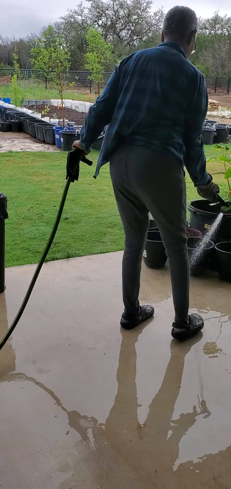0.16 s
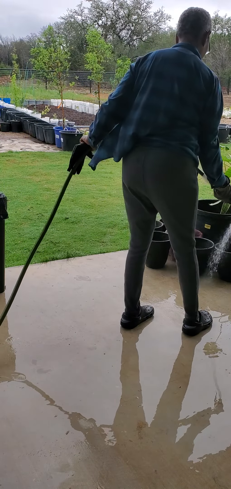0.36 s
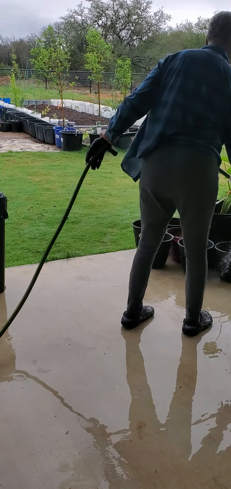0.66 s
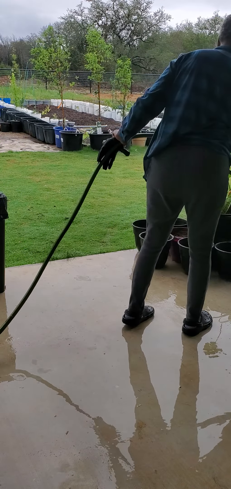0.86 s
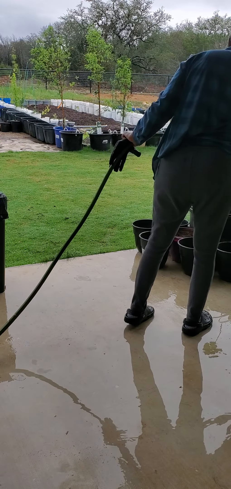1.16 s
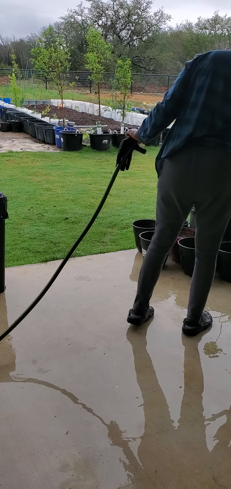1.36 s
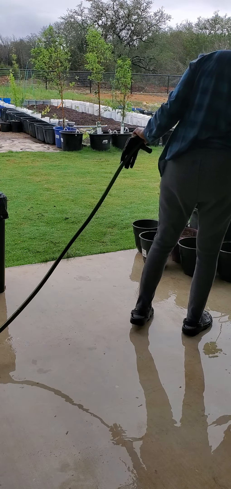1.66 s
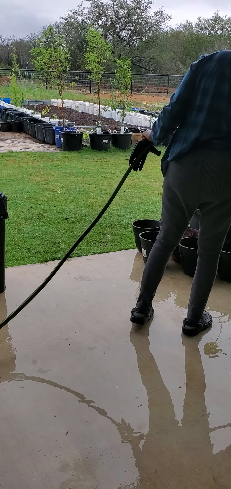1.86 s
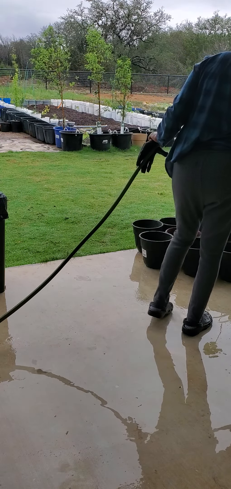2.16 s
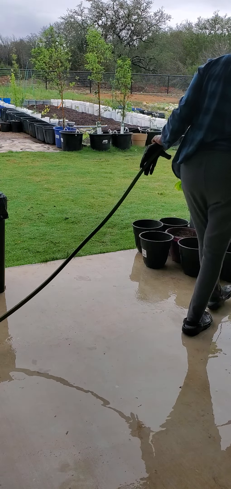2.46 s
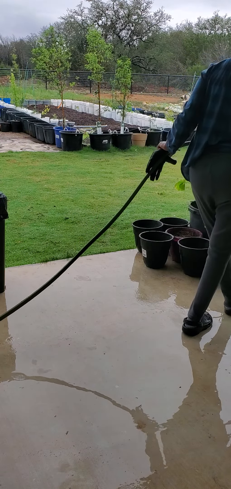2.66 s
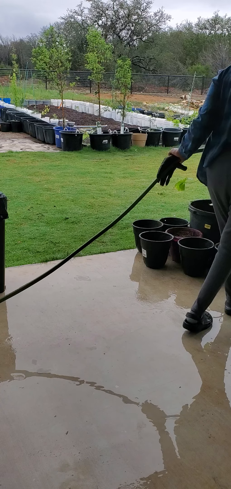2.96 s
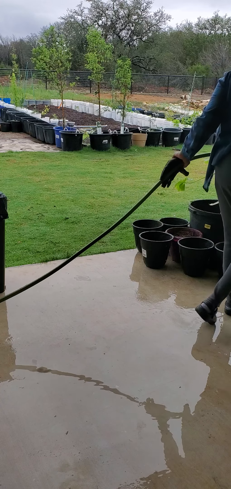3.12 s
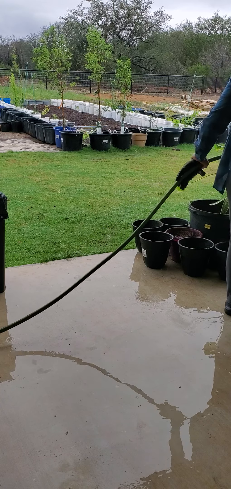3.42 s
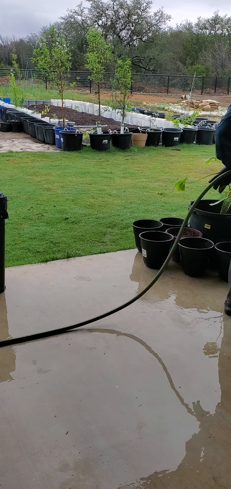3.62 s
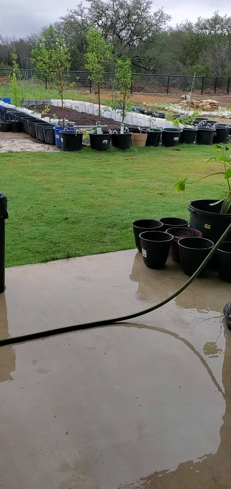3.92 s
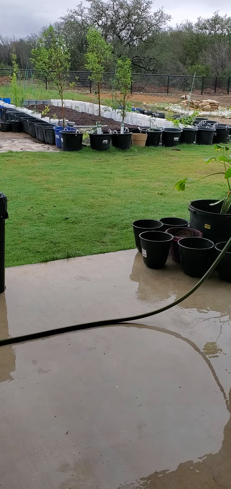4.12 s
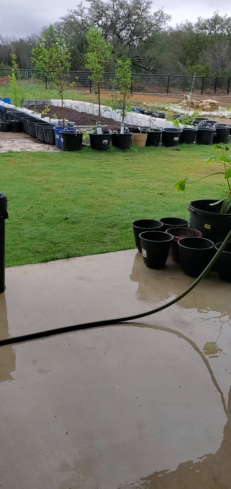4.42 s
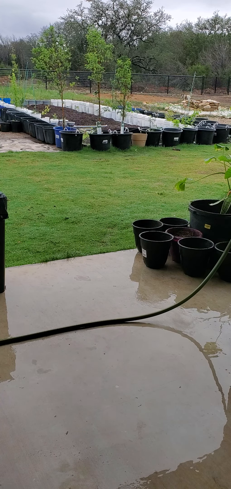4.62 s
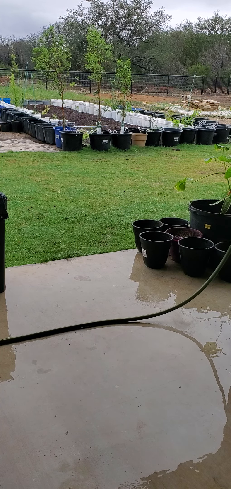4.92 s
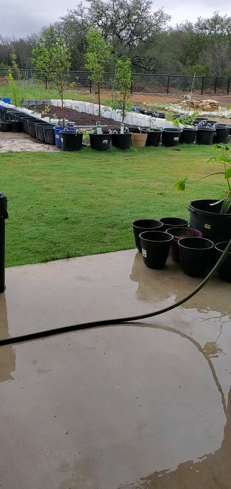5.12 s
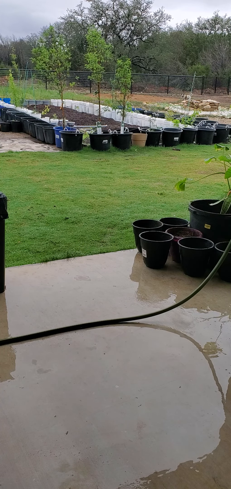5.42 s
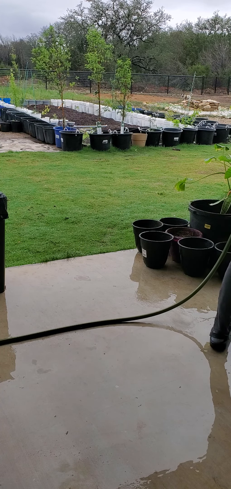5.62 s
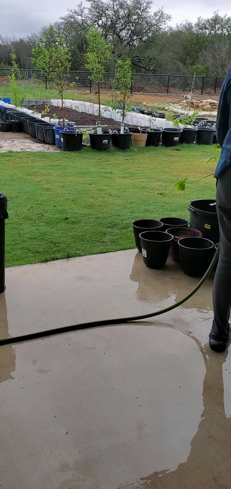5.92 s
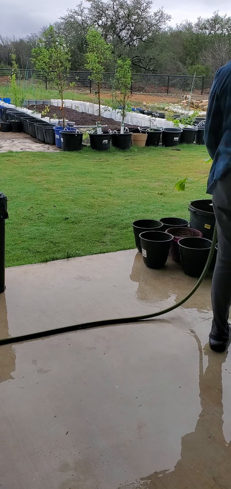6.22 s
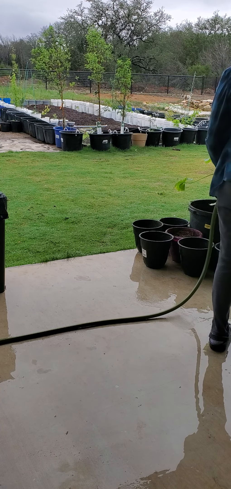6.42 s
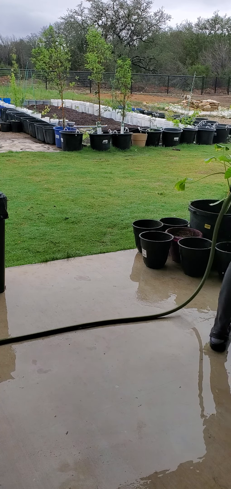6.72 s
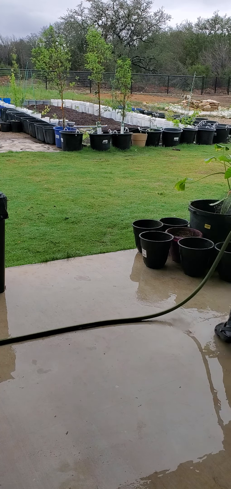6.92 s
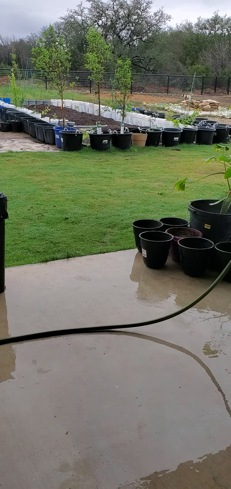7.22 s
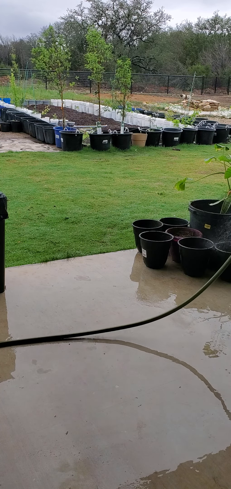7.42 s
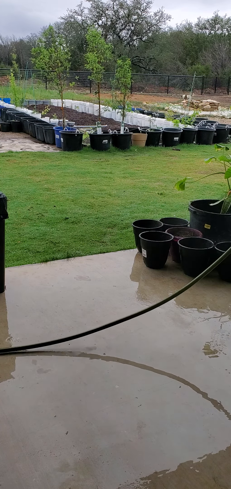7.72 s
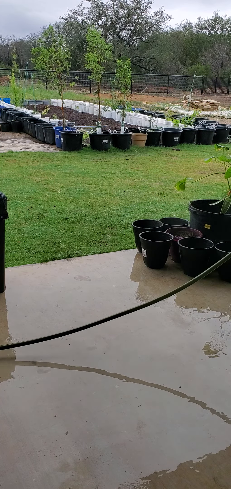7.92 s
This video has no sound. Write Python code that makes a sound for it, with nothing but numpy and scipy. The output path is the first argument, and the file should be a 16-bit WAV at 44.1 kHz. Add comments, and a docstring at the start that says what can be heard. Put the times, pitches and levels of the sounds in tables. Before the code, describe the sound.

Hose water hisses and patters on leaves and wet concrete, then thins to softer splashing over a low outdoor rumble.

```python
"""A bright fizz of spray on leaves opens the scene: a hose waters potted plants on a wet concrete patio.
Each drop's impact is a tiny noise burst; thousands merge into fizz, splash and hiss over outdoor rumble
and a far engine. Hollow rings and bands of high hiss come and go, and large drops tick close by. Later
the spray drums on the resonant walls of two plastic pots, gouts of water slap down and wind puffs once.
The fizz eases while the jet is aimed into soil."""
import sys
import numpy as np
from scipy import signal
from scipy.fft import rfft, irfft
from scipy.io import wavfile
from scipy.ndimage import uniform_filter1d

SR = 44100
rng = np.random.default_rng(int(sys.argv[2]) if len(sys.argv) > 2 else 0)


def unload_audio(sound):
    """Save the sound as a 16-bit wav file, at the path given as the first command line argument."""
    columns = np.transpose(np.atleast_2d(sound))
    # keep every value between -1 and 1, then stretch to whole-number steps
    steps = np.round(np.clip(columns, -1, 1) * 32767)
    wavfile.write(sys.argv[1], SR, steps.astype(np.int16))


N = 355887
TIME, FREQS = np.arange(N) / SR, np.fft.rfftfreq(N, 1 / SR)

# Levels are relative within each table; T60 is the time to decay by 60 dB.
# spray on the leaves, and steady splash on wet ground: t/s, level/dB
LEAF_FLOW = [(0, -34.5), (0.9, -35), (1.35, -34), (1.9, -36), (2.55, -33), (2.95, -34), (3.55, -38),
             (4.2, -38.5), (4.68, -38), (5.05, -56), (5.6, -59), (6.18, -51.5), (6.42, -66.5), (6.79, -40),
             (7.03, -56), (7.72, -48.5), (7.93, -49.5), (8.07, -56)]
GROUND_FLOW = [(0, -49), (2.8, -53), (4.3, -56), (5.05, -61.5), (6.0, -55.5), (6.5, -63), (6.95, -45.5),
               (7.22, -41.5), (7.9, -43.5), (8.07, -47)]
# the jet swings from leaves to soil: t/s, half length/s, splash level/dB, hiss level/dB, fizz dip/dB
JET_SWINGS = [(0.16, 0.07, -45.5, -46.5, 2), (0.297, 0.087, -42, -39, 3.5), (1.112, 0.13, -43.5, -48, 5.5),
              (1.688, 0.11, -41.5, -40, 5), (2.286, 0.18, -41.5, -48.5, 6), (2.666, 0.12, -42.5, -39.5, 4),
              (3.763, 0.18, -40.5, -61, 0), (6.766, 0.17, -42, -42, 5)]
# the jet clips a rim and spits mist: t/s, level/dB, T60/s
RIM_SPITS = [(0.097, -33.5, .25), (.874, -37, .22), (2.56, -36, 0.16), (2.803, -33, 0.083),
             (3.46, -39, 0.4), (4.01, -39, 0.22), (4.135, -40.5, .25), (4.72, -45, 0.49)]
# swells of the engine's drone: t/s, half length/s, level/dB
ENGINE_SWELLS = [(0, .35, -57), (1.25, 0.7, -48.5), (3.05, 0.19, -51)]
# brief hollow rings and narrow bands of high hiss as the jet moves: t/s, f/Hz, level/dB, half length/s
SPRAY_RESONANCES = [(0.282, 2020, -40.5, 0.048), (.97, 1400, -52, 0.12), (1.55, 6640, -57, .35),
                    (1.757, 2680, -45, 0.11), (1.776, 3930, -47, .14), (2.24, 2450, -44, 0.072),
                    (2.71, 1840, -49, 0.23), (3.365, 6600, -43.5, 0.27), (4.55, 6250, -54, 0.44),
                    (6.78, 2970, -41.5, 0.13), (7.197, 1490, -44.5, 0.05), (7.93, 1500, -44.5, 0.059)]
# large drops striking leaves: t/s, level/dB, T60/s
DROP_TICKS = [(.486, -22, .02), (.5315, -20, .012), (.627, -37, .015), (1.033, -26, .02), (1.688, -27, .04),
              (2.809, -24, .02), (3.047, -29, .015), (3.697, -25, .015), (4.4105, -16.5, .014),
              (4.417, -24, .015), (4.913, -36, .05), (5.365, -44, 0.23), (5.677, -38, .02),
              (5.697, -41, .053), (5.973, -35, 0.012), (6.048, -37, .06), (6.125, -39, .04),
              (7.611, -40, .02), (7.676, -36, 0.077), (7.792, -34, .04)]
# the jet crosses two plastic pots, one row a pot: t/s, level/dB, approach/s, leaving/s
POT_CROSSINGS = [(3.775, -35, 0.15, 0.14), (6.81, -37.5, 0.2, 0.17)]
# their modes, one list a pot: f/Hz, width/Hz, level/dB
POT_RESONANCES = [
    [(354, 55, -1), (465, 40, 3.5), (534, 64, -2), (613, 69, -2.5), (835, 79, -7), (1340, 130, -4),
     (1840, 140, -6.5)],
    [(235, 90, -8), (350, 60, -3), (450, 43, 2), (547, 150, -1.5), (840, 100, -7.5), (2820, 510, -7.5),
     (3550, 450, -12), (4000, 220, -14)],
]
# gouts of water landing: t/s, level/dB, rise/s, T60/s
GOUTS = [(3.909, -26.5, .005, 0.35), (3.933, -21.5, .002, 0.08), (3.948, -28, 0.0036, 0.13),
         (5.612, -41, 0.015, 0.15)]
# spectral densities of the noise sources: f/Hz, level/dB
FIZZ_SPECTRUM = [(200, -49), (1200, -39), (3000, -24.5), (6000, -7), (9000, -5), (12000, 1), (14000, 1.5),
                 (15800, 2)]
SPLASH_SPECTRUM = [(80, -31), (250, -61), (480, -7), (750, -24.5), (1050, -4), (1400, 2.5), (1900, 1.5),
                   (2600, 2.5), (3600, -2.5), (5000, -6), (8000, -13), (16000, -20)]
PLASH_SPECTRUM = [(80, -11), (190, -3.5), (300, -0.5), (480, -3.5), (700, -3.5), (900, -1.5), (1200, -11.5),
                  (2500, -13), (16000, -62)]
MIST_SPECTRUM = [(200, -40), (1200, -32), (2300, -7.5), (3400, -1), (4400, 0.5), (5400, -0.5), (6500, -1),
                 (8500, -7.5), (11000, -13), (16000, -12)]
NOZZLE_SPECTRUM = [(500, -28), (2000, -25), (2900, -0.5), (3450, 2), (4300, -2.5), (7000, -11),
                   (16000, -42)]
RUMBLE_SPECTRUM = [(15, -30), (32, -19), (55, 3), (85, -2.5), (120, -1.5), (155, -10), (190, -7.5),
                   (250, -13), (450, -14.5), (800, -19), (1400, -28), (3000, -38), (16000, -40)]
SLAP_SPECTRUM = [(150, -26), (700, -14), (1300, 1.5), (1900, -7.5), (2500, -1.5), (3300, 4.5), (4400, 0.5),
                 (6000, -0.5), (8000, -8.5), (11500, -8), (16000, -26)]
WIND_SPECTRUM = [(15, -12), (30, -5), (62, 1), (110, -8), (200, -18), (600, -51), (16000, -90)]
# likeness of the sound at the two microphone ports: f/Hz, coherence/1
PORT_COHERENCE = [(25, .85), (60, .95), (140, .97), (300, .86), (640, .36), (950, .15), (1500, .58),
                  (2200, .17), (4800, .2), (8000, .1), (16000, .1)]
# lead of the left port over the right: f/Hz, phase/rad
PORT_LEAD = [(200, 0), (600, 0), (1000, -.3), (1500, -1.45), (2200, -.8), (3000, 1), (4800, 0),
             (6400, -1.5), (8500, -3), (16000, -4.4)]
# response of the ports, shared and left minus right: f/Hz, level/dB
PORT_RESPONSE = [(5500, -0.5), (6750, 2), (7150, -2), (7550, -6.5), (8200, -2.5), (9200, 1.5), (11000, 0.5)]
PORT_BALANCE = [(100, -1), (500, -0.5), (1200, 2), (3000, 1.5), (5000, -0.2), (6700, -0.5), (7900, 4.5),
                (9000, .2), (10500, 0.5), (12300, -.4), (14000, 3), (16000, 7)]


def gain_of(db):
    """Amplitude ratio: a factor of ten for every 20 dB."""
    return 10 ** (np.asarray(db) / 20)


def unit_rms(x):
    """Normalisation to a mean power of 1."""
    return x / np.sqrt(np.mean(x ** 2) + 1e-20)


def curve(points):
    """Interpolation of a table (f/Hz, value) along a logarithmic frequency axis."""
    hz, value = np.transpose(points)
    return np.interp(np.log(FREQS + 1), np.log(hz + 1), value)


def envelope(rows):
    """Interpolation in decibels turns a table (t/s, level/dB) into a gain at every sample."""
    return gain_of(np.interp(TIME, *np.transpose(rows)))


def white_noise():
    """Two uncorrelated signals of flat spectrum."""
    return rng.standard_normal((2, N))


def wander(hz):
    """Low-pass filtered noise: a slow random fluctuation of rms 1, up to about hz."""
    return unit_rms(irfft(rfft(rng.standard_normal(N)) * (FREQS > 2) / (1 + (FREQS / hz) ** 2), N))


def at_ports(pair, response):
    """Partial coherence: two unrelated signals are filtered, mixed and phase shifted; rms 1."""
    left, unrelated = rfft(pair) * response
    coherence = np.clip(curve(PORT_COHERENCE), 0, 1)
    right = (coherence * left + np.sqrt(1 - coherence ** 2) * unrelated) * np.exp(-1j * curve(PORT_LEAD))
    return unit_rms(irfft(np.array([left, right]), N))


def strike(s, rise_s, t60):
    """Transient envelope: a linear rise from time s, then exponential decay."""
    age = np.maximum(TIME - s, 0)
    return np.minimum(age / rise_s, 1) * np.exp(-np.log(1000) * np.clip((age - rise_s) / t60, 0, 2))


def swell(s, half_s):
    """Generalised Gaussian envelope: a flat-topped bell of height 1 around time s."""
    return np.exp(-np.minimum(abs((TIME - s) / half_s) ** 2.9, 20))


def with_swells(steady, rows):
    """Incoherent sounds add in power: a steady gain plus swells (t/s, half length/s, level/dB)."""
    return np.sqrt(steady ** 2 + sum((gain_of(db) * swell(s, half_s)) ** 2 for s, half_s, db in rows))


def modes(rows):
    """Modal response: resonance peaks add in power; damping by water sets their least width."""
    return np.sqrt(sum(gain_of(db) ** 2 / (1 + (2 * (FREQS - hz) / max(width, 60)) ** 2) ** 1.3
                       for hz, width, db in rows))


def drops(per_s, spread_db, burst_s, clump_db, clump_hz):
    """Shot noise: random impacts give tiny decaying bursts, which clump as the jet breaks up."""
    size = gain_of(spread_db * np.minimum(rng.exponential(1, N), 5))
    hits = size ** 2 * (rng.random(N) < per_s / SR)
    power = signal.lfilter([1], [1, -np.exp(-1 / (burst_s * SR))], hits)
    onsets = rng.random(N) * (rng.random(N) < 2 * clump_hz / SR)
    clumps = signal.lfilter([1], [1, -np.exp(-2 * clump_hz / SR)], onsets)
    return np.sqrt(power) * gain_of(clump_db * unit_rms(clumps - clumps.mean())) * white_noise()


def roaming(x, patch_db):
    """Spectral modulation: as the jet roams over leaves and rims, patches of spectrum swell and fade."""
    spectra = signal.stft(x, nperseg=512)[2]
    patches = rng.standard_normal(spectra.shape[1:]) + 2.7 * rng.standard_normal(spectra.shape)
    for _ in range(2):
        patches = uniform_filter1d(patches, size=4, axis=1)  # across frequency
        patches = uniform_filter1d(patches, size=27, axis=2)  # across time
    return signal.istft(spectra * gain_of(patch_db * unit_rms(patches)), nperseg=512)[1][:, :N]


def spray_on_leaves():
    """Amplitude modulation: less spray reaches the leaves each time the jet swings away."""
    dip_db = sum(db * swell(s, half_s) for s, half_s, _, _, db in JET_SWINGS)
    return envelope(LEAF_FLOW) * gain_of(-dip_db)


def leaf_fizz():
    """Brief impacts have broad spectra: fine drops fizz on leaves, and a few larger ones crackle."""
    fine = drops(per_s=6000, spread_db=1.0, burst_s=0.00071, clump_db=1, clump_hz=23.8)
    large = drops(per_s=120, spread_db=4.5, burst_s=0.00048, clump_db=-6.5, clump_hz=12)
    flow = spray_on_leaves()
    sparseness = (flow / flow.max()) ** -.27  # single drops stand out when the spray is thin
    spray = roaming(unit_rms(fine), patch_db=1) + gain_of(-19.5) * sparseness * unit_rms(large)
    sway = gain_of(.5 * sparseness * wander(hz=12))  # leaves move in and out of the spray
    return gain_of(6.0) * flow * at_ports(sway * spray, gain_of(curve(FIZZ_SPECTRUM)))


def ground_splash():
    """Impact noise of heavier drops on soil and concrete, with a low plash where water stands."""
    shower = drops(per_s=3500, spread_db=1.0, burst_s=0.0013, clump_db=0.56, clump_hz=37.4)
    flow = with_swells(envelope(GROUND_FLOW), [(s, half_s, db) for s, half_s, db, _, _ in JET_SWINGS])
    splash = flow * at_ports(roaming(shower, patch_db=1.0), gain_of(curve(SPLASH_SPECTRUM)))
    fullness = flow / gain_of(-39)  # 1 at full splash
    plash = gain_of(-50) * fullness ** 0.83 * at_ports(shower, gain_of(curve(PLASH_SPECTRUM)))
    return gain_of(2.0) * (splash + plash)


def jet_hiss(mist_lag_s=0.019):
    """Broadband flow noise: mist flares after swings and spits off rims, over the nozzle's steady rush."""
    mist = drops(per_s=4500, spread_db=1.0, burst_s=0.00081, clump_db=1, clump_hz=41.0)
    fullness = spray_on_leaves() / gain_of(-34)  # 1 at full spray
    steady = gain_of(-43.5) * fullness ** 0.81
    spits = sum(gain_of(db) * strike(s, rise_s=0.0073, t60=t60) for s, db, t60 in RIM_SPITS)
    flares = [(s + mist_lag_s, half_s, db) for s, half_s, _, db, _ in JET_SWINGS]
    flow = with_swells(np.hypot(steady, spits), flares)
    rush = at_ports(white_noise(), gain_of(curve(NOZZLE_SPECTRUM)))
    hiss = at_ports(roaming(mist, patch_db=2.5), gain_of(curve(MIST_SPECTRUM)))
    return gain_of(4) * flow * hiss + gain_of(-55) * rush


def outdoor_rumble():
    """Stationary noise from far away, strongest at low frequencies."""
    return gain_of(-49.5) * at_ports(white_noise(), gain_of(curve(RUMBLE_SPECTRUM)))


def far_engine(idle_hz=85.75, climb_start_s=1.1, climb_hz_per_s=3.2):
    """A periodic source: two harmonics rise in pitch as the idling engine slowly gathers speed."""
    hz = idle_hz + climb_hz_per_s * np.maximum(TIME - climb_start_s, 0)
    phase = 2 * np.pi * np.cumsum(hz * (1 + 0.004 * wander(hz=6.4))) / SR
    drone = unit_rms(np.sin(phase) + gain_of(-11.5) * np.sin(2 * phase))
    return with_swells(gain_of(-60), ENGINE_SWELLS) * drone


def spray_resonances(q=13):
    """Resonance driven by noise: brief hollow rings and narrow bands of high hiss as the jet moves."""
    rush = white_noise()
    return sum(gain_of(db) * swell(s, half_s) ** 2 * at_ports(rush, modes([(hz, hz / q, 0)]))
               for s, hz, db, half_s in SPRAY_RESONANCES)


def drop_ticks():
    """Impulsive sources: single large drops shatter on a leaf in short broadband bursts."""
    bursts = sum(gain_of(db) * strike(s, rise_s=0.00043, t60=t60) for s, db, t60 in DROP_TICKS)
    return gain_of(1.5) * bursts * at_ports(white_noise(), gain_of(curve(FIZZ_SPECTRUM)))


def pot_drumming(edge_loss_db=9):
    """Forced vibration: drops drive the modes of thin plastic walls, loudest as the jet is mid-pot."""
    shower = drops(per_s=900, spread_db=-3.5, burst_s=0.00028, clump_db=-1.5, clump_hz=30)
    drumming = np.zeros((2, N))
    for (s, db, approach_s, leaving_s), body in zip(POT_CROSSINGS, POT_RESONANCES):
        off_centre = np.maximum((s - TIME) / approach_s, (TIME - s) / leaving_s)
        drumming += gain_of(db - edge_loss_db * off_centre ** 1.37) * at_ports(shower, modes(body))
    return gain_of(1.5) * drumming


def water_slaps():
    """Impact transients: a gout of water lands with a short crack, then a dense packet of drops."""
    cracks = sum(gain_of(db) * strike(s, rise_s, t60=.027) for s, db, rise_s, _ in GOUTS)
    packets = sum(gain_of(db) * strike(s, rise_s, t60) for s, db, rise_s, t60 in GOUTS)
    shower = drops(per_s=4000, spread_db=-1.0, burst_s=0.0008, clump_db=0.5, clump_hz=120)
    colour = gain_of(curve(SLAP_SPECTRUM))
    return packets * at_ports(shower, colour) + gain_of(-3) * cracks * at_ports(white_noise(), colour)


def wind_puff():
    """Low-frequency pressure fluctuations: one puff of wind, mostly on the right port."""
    puff = gain_of(-40.5) * strike(4.47, rise_s=.03, t60=0.95)
    return puff * at_ports(white_noise(), gain_of(curve(WIND_SPECTRUM))) * gain_of([[-10], [2]])


def patio_echoes(x, t60=0.098, echoes_per_s=2000, wet_db=-10, cutoff_hz=5000):
    """Reflection: the slab and house wall add sparse, duller, quickly dying echoes to the direct sound."""
    t = TIME[:SR // 3]
    taps = rng.standard_normal((2, len(t))) * (rng.random((2, len(t))) < echoes_per_s / SR) * (t > .003)
    taps *= np.exp(-np.log(1000) * t / t60)
    taps /= np.linalg.norm(taps, axis=1, keepdims=True)
    taps = signal.lfilter(*signal.butter(1, cutoff_hz, fs=SR), taps)
    return x + gain_of(wet_db) * signal.fftconvolve(x, taps, axes=1)[:, :N]


def scene():
    """Superposition: the water echoes on the patio; the nearest drops and the background arrive dry."""
    water = leaf_fizz() + ground_splash() + jet_hiss() + pot_drumming() + spray_resonances()
    water += water_slaps()
    return patio_echoes(water) + drop_ticks() + outdoor_rumble() + far_engine() + wind_puff()


def record(dry):
    """Linear filtering: each port notches the treble in its own way, and a low-pass limits the band."""
    response_db = curve(PORT_RESPONSE) + np.array([[.5], [-.5]]) * curve(PORT_BALANCE)
    coloured = irfft(rfft(dry) * gain_of(response_db), N)
    low_pass = signal.firwin(611, cutoff=15800, window=("kaiser", 8), fs=SR)
    return signal.oaconvolve(coloured, low_pass[None], "same")


dry = scene()
out = record(dry)
unload_audio(out)
```